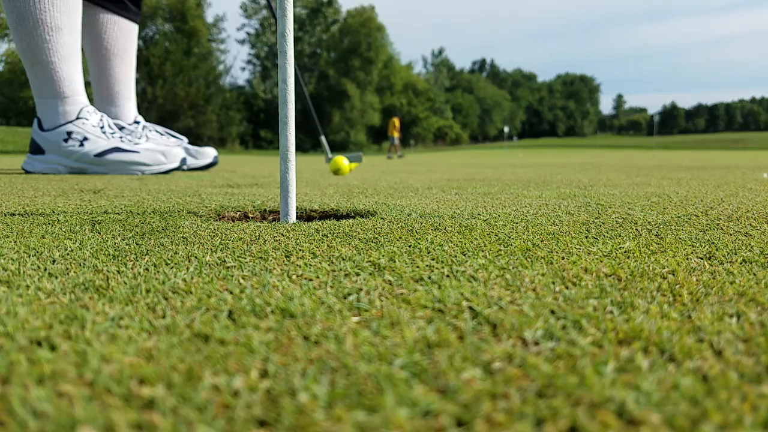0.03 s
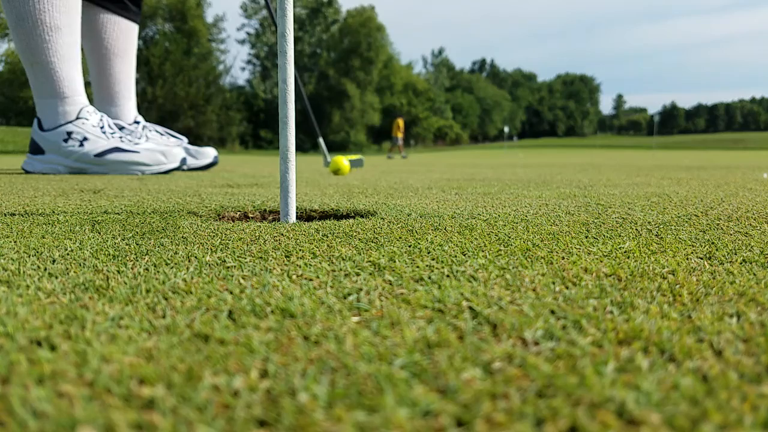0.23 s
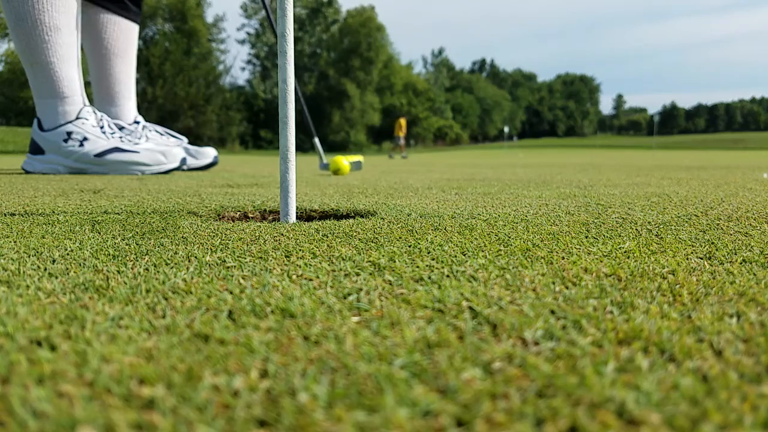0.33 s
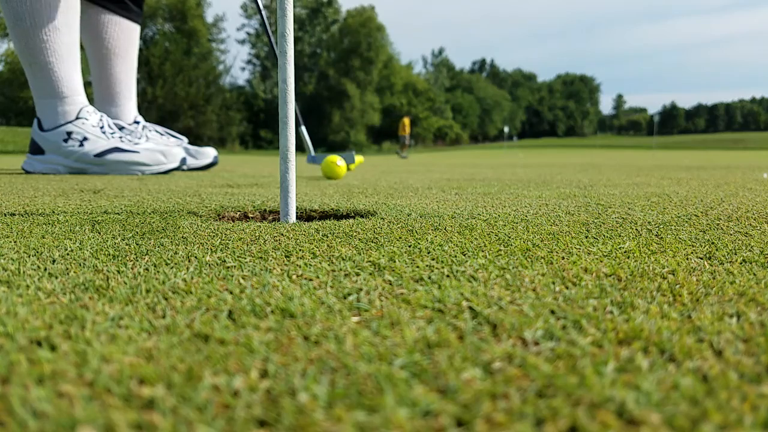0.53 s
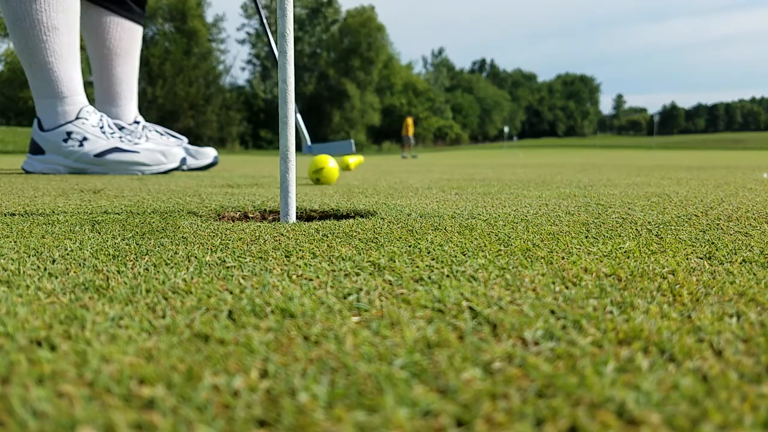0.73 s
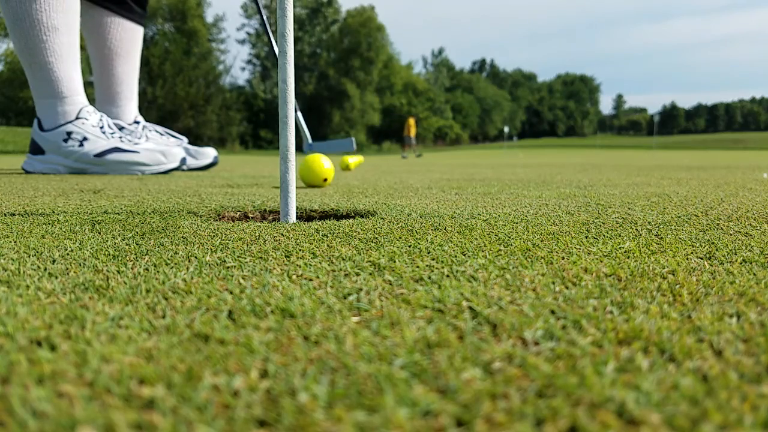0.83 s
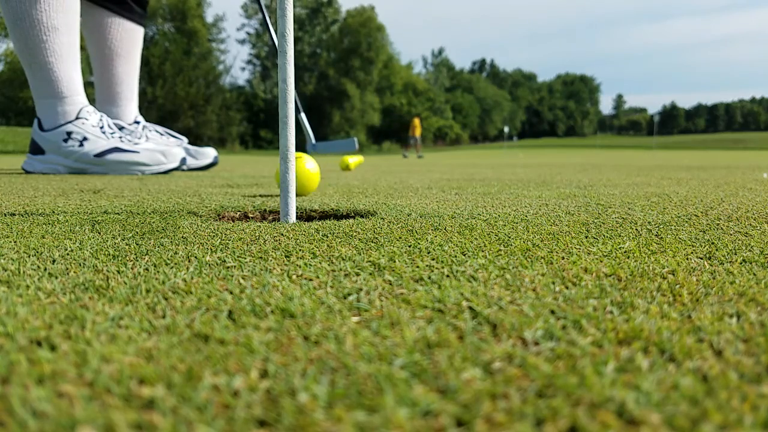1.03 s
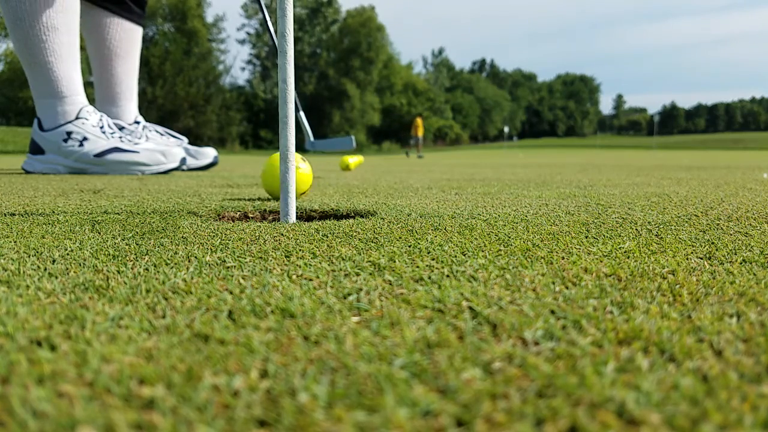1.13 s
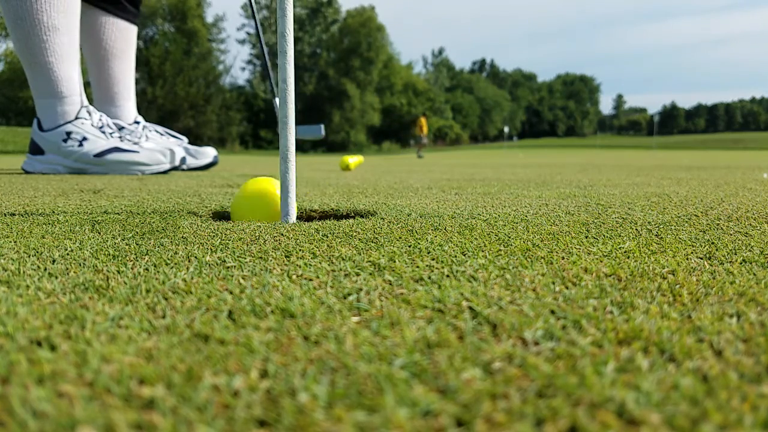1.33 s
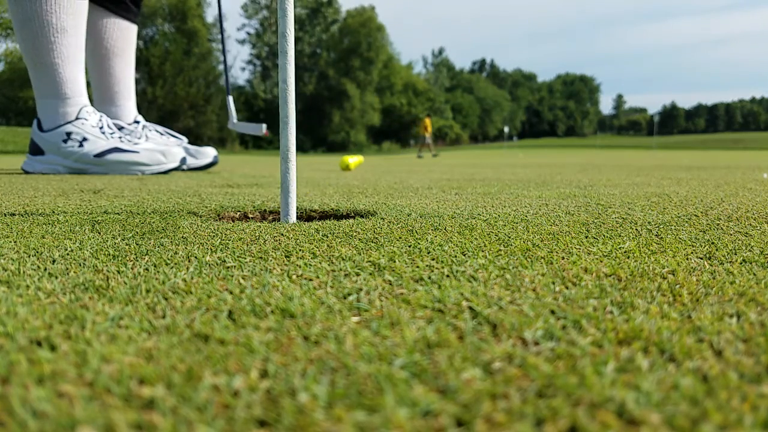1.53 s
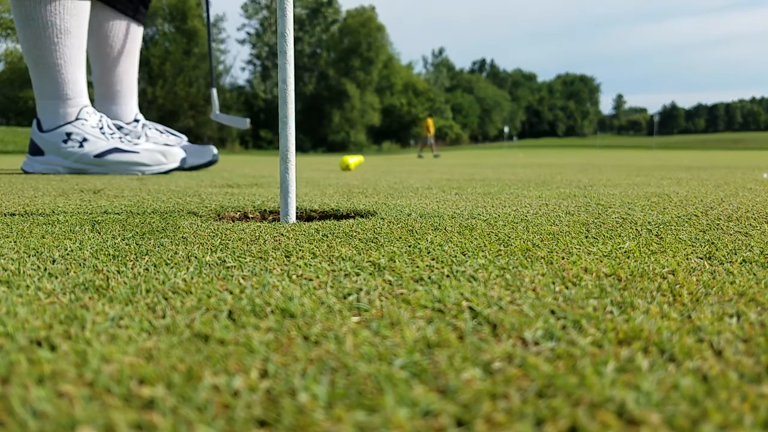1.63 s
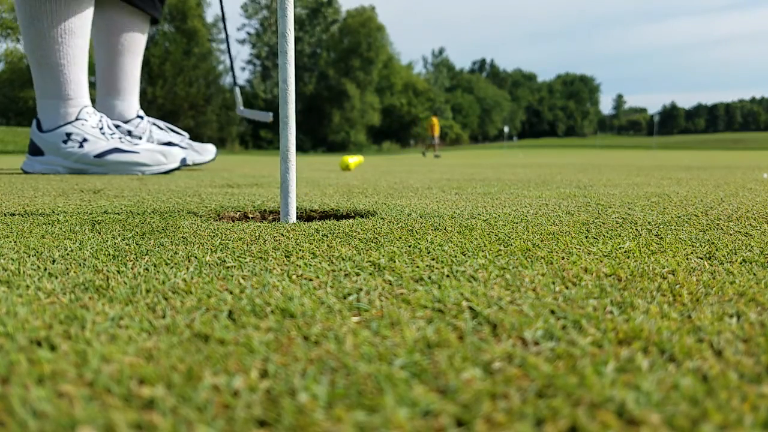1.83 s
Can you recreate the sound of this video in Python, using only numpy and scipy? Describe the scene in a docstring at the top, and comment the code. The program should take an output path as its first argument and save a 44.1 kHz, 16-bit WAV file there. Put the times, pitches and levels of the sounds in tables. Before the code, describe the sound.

A golf ball drops into a cup: a dry putter click, about a second of quiet outdoor traffic rumble, then a quick hollow rattle with a bright ring, close to the microphone, stronger on the left.

```python
"""Far traffic rumbles and an insect chirps thinly; soon a putter clicks on a ball, mostly on the left.
A second later the ball, after faintly brushing the grass, hits the flagstick, rattles down the cup and
bounces on its bottom, ringing the hollow and the liner. Knocks are sums of fading sine waves plus bursts
of coloured noise; traffic, grass, insect and hiss are coloured noise, all but the hiss shaped over time."""
import sys
import numpy as np
from scipy.fft import rfft, irfft, next_fast_len
from scipy.io import wavfile
from scipy.ndimage import uniform_filter1d, map_coordinates

SR = 44100
rng = np.random.default_rng(int(sys.argv[2]) if len(sys.argv) > 2 else 0)


def transcribe(u):
    """Save the signal u as a 16-bit wav file named by the first command-line argument.

    u: samples, shape (n,) or (channels, n), limited to [-1, 1]; the rate is SR.
    q: integer samples, one column per channel.
    """
    v = np.clip(np.atleast_2d(u).T, -1, 1)
    q = np.round(v * 32767).astype(np.int16)
    wavfile.write(sys.argv[1], SR, q)


N = 83790  # length in samples, 1.9 s

# All noise colours below are relative levels: noise() sets the overall strength to 1.
# microphone hiss, its colour: f/Hz, level per Hz/dB
HISS_COLOUR = [(1000, 0), (4000, -7.5), (7000, -12.5), (10000, -0.5), (12500, -4), (15500, 3.5)]
HISS_DB, RIGHT_HISS_DB = -53, -9.5  # left level; right level relative to the left

# traffic, mean levels before a slight waver: t/s, rumble level/dB, road roar level/dB
TRAFFIC_LEVELS = [(0, -30.5, -38.5), (.12, -34, -37), (.3, -30.5, -36), (.5, -32.5, -34.5),
                  (.75, -31.5, -34.5), (1.05, -34.5, -33.5), (1.35, -32, -34), (1.6, -31.5, -32.5),
                  (1.9, -35.5, -39.5)]
# engine rumble, its colour: f/Hz, level per Hz/dB
RUMBLE_COLOUR = [(20, -25), (40, -14.5), (62, -11), (82, -3.5), (115, -0.5), (143, 0.5), (170, -1.5),
                 (245, -2), (300, -7.5), (420, -11), (700, -12.5), (1500, -46.5)]
# tyre roar, its colour: f/Hz, level per Hz/dB
ROAR_COLOUR = [(100, -31), (350, -10.5), (500, -7.5), (620, -3), (715, 3), (820, -2.5), (950, -4.5),
               (1300, -5), (2000, -12), (3000, -23.5), (4500, -33), (8000, -55), (16000, -59)]

# insect in the grass, its colour: f/Hz, level per Hz/dB
CHIRP_COLOUR = [(7000, -30), (8700, 8), (10000, 0), (11000, -19), (13000, -25)]
CHIRP_FIRST_S, CHIRP_PERIOD_S, CHIRP_WIDTH_S, CHIRP_DB = 0.086, 0.23, 0.03, -63

# ball brushing the grass, mean level before a flutter: t/s, level/dB
ROLL_LEVELS = [(0.9, -85), (1.12, -60), (1.2, -54), (1.25, -66), (1.39, -60), (1.43, -87)]
# brushed grass, its colour: f/Hz, level per Hz/dB
GRASS_COLOUR = [(1000, -15), (3000, 0), (7000, -1), (14000, 3)]

# ringing of putter and ball, relative levels: f/Hz, level/dB, time to fall 60 dB (t60)/s
PUTT_MODES = [(430, -13, 0.0078), (840, 5.5, 0.0044), (1200, -7.5, .006), (2220, -1, 0.0053),
              (2780, -5, 0.006), (3980, -9.5, 0.014), (5000, -25, 0.01), (6850, -26, 0.0079),
              (8060, -21, 0.0092), (9100, -23, 0.0079)]
PUTT_S, PUTT_DB, PUTT_CONTACT_S = 0.4076, -6.5, 0.00025  # time, level, rise time of the push
PUTT_TICK_DB, PUTT_TICK_T60_S = -33, 0.005  # noisy tick, relative to PUTT_DB

# ball against stick and cup: t/s, then thud, hollow, liner, treble, stick, scuff and crack level/dB,
# swell time/s, pitch sag/share of the pitch, hollow ring time/ratio
CONTACTS = [ (1.4088, -31, -22.5, -40, -54, -50, -34, -26, 0.00024, 0.011, 1.9),
            (1.4161, -20, -13, -41, -45, -39, -21.5, -23, 0.0011, 0.0087, 0.75),
            (1.4323, -35, -16, -46, -60, -46, -49, -40, 0.0014, .01, 0.41),
            (1.4397, -19, -23, -43, -56, -46, -36, -34, 0.0022, .01, 0.43),
            (1.4483, -50, -19, -42, -58, -60, -25.5, -20.5, 0.00064, 0.0091, 0.77),
            (1.4557, -17.5, 5, -32, -49, -29.5, -22, -5, 0.0041, 0.054, 0.43),
            (1.4769, -49, -16.5, -40, -54, -48, -46, -40, .001, 0.008, 0.51),
            (1.4991, -22, -26.5, -42, -56, -49, -38, -41, 0.0015, 0.013, 1.1),
            (1.53, -16.5, -4.5, -8.5, -19, -33, -16, -3, 0.00039, 0.033, 0.89),
            (1.5374, -30, -8.5, -13, -26.5, -28, -18.5, -29, 0.0025, 0.048, 0.53),
            (1.5520, -17.5, -7, -22, -33, -46, -26, -38, 0.0031, 0.0075, 0.72),
            (1.5891, -16.5, -13.5, -18, -40, -49, -24, -19, 0.0012, 0.062, 0.44),
            (1.6024, -16.5, -13, -42, -39, -58, -34, -40, 0.0038, 0.0069, 0.77),
            (1.6230, -26, -39, -52, -50, -55, -43, -36, 0.00065, .01, 0.71)]
# Ringing below: relative levels, each nudged at random by about 1 dB at every contact.
# thud of the cup in the soil: f/Hz, level/dB, t60/s
THUD_MODES = [(174.5, -7.5, 0.13), (233.5, -8, 0.24), (378.7, -6, 0.18), (416.5, 1, 0.11), (501, -5, 0.08)]
# hollow of the cup: f/Hz, level/dB, t60 before the contact's ratio/s
HOLLOW_MODES = [(1076, -14, .05), (1109, 4.5, 0.064), (1265, -9, 0.064)]
# cup liner: f/Hz, level/dB, t60/s
LINER_MODES = [(2025, 2, 0.06), (2190, -10, 0.034), (4026, -4, 0.068)]
# bright ring of the liner: f/Hz, level/dB, t60/s
TREBLE_MODES = [(6560, -10, .065), (7495, -7, .075), (9645, 0, .04), (10320, -6, .05), (10645, -9, .1),
                (11500, -6, .05), (13535, -13, .11)]
# flagstick: f/Hz, level/dB, t60/s
STICK_MODES = [(2120, 0, .07), (3990, -1, .06), (4400, -4, .05), (6680, -6, .08), (7035, -5, .08),
               (14200, -14, .05), (15570, -6, .06)]
# toneless scuff of a contact, also used in the putt's tick: f/Hz, level per Hz/dB
SCUFF_COLOUR = [(80, -16), (400, 6.5), (750, -6.5), (1300, 3), (1700, -4.5), (2300, 1.5), (3000, -8.5),
                (4200, -4.5), (5500, -20), (10000, -23), (16000, -19)]
# crack at the instant of contact: f/Hz, level per Hz/dB
CRACK_COLOUR = [(120, -24), (400, -5), (800, -10), (1350, 7), (1750, -13), (2300, -1), (2900, -22),
                (3600, 2.5), (4400, -19), (6000, -15), (10000, -24.5), (16000, -26)]
SCUFF_T60_S, CRACK_T60_S = 0.074, 0.016
SAG_S = 0.0204  # recovery time of the pitch, which is flat while the ball presses on the cup
ROUGH_RAD, ROUGH_PER_S = 0.38, 235  # size and speed of the unsteadiness in phase

# likeness of the two channels: f/Hz, left-right correlation (1 = identical)
ALIKE = [(30, 0.77), (100, .95), (1000, 0.93), (3000, 0.76), (8000, 0.27)]
# shading of the right microphone: f/Hz, level/dB
RIGHT_SHADE = [(1000, 0), (2000, -1), (4000, 1), (8000, -5.5), (13000, -5)]
# the right microphone is further from every source: (level in dB, delay in s)
RIGHT_RUMBLE, RIGHT_ROAR = (-9, 0.00028), (-11, 0.00036)
RIGHT_PUTT, RIGHT_CUP = (-10.5, 0.00004), (-11.5, 0.00013)

# the recorder: gain control, ceiling (1 = full scale) and band limits
LIMIT_DB, LIMIT_WINDOW_S, RECOVER_DB_PER_S = -6.5, 0.0033, 6
CLIP_TOP, LOW_CUT_HZ, TOP_HZ = 0.96, 44.5, 16000


def amp(db):
    """Turn decibels into a gain."""
    return 10 ** (np.asarray(db) / 20)


def unit(x):
    """Scale to an rms (average strength) of 1."""
    return x / np.sqrt(np.mean(x ** 2) + 1e-20)


def along(points, hz):
    """Read a curve of (f, value) points at any frequency, on a log axis."""
    f, value = np.transpose(points)
    return np.interp(np.log(hz + 1), np.log(f + 1), value)


def fade(t, t60):
    """Die away exponentially, 60 dB down at t60."""
    return np.exp(-np.log(1000) * t / t60)


def wobble(rate, size):
    """Draw a smooth random curve through `rate` random points a second."""
    points = rng.standard_normal(2048)
    return map_coordinates(points, [np.arange(size) * rate / SR + 2], mode="wrap")


def noise(colour, alike, size):
    """Make coloured stereo noise of rms 1 whose channels are as alike as asked at each frequency."""
    m = next_fast_len(size + 8192)
    hz = np.fft.rfftfreq(m, 1 / SR)
    # a shared and an opposed part, mixed by an angle, give the wanted correlation
    turn = np.arccos(np.clip(along(alike, hz), -1, 1)) / 2
    white = rfft(rng.standard_normal((2, m)))
    coloured = white * amp(along(colour, hz)) * [np.cos(turn), np.sin(turn)]
    mid, side = irfft(coloured, m)[:, :size]
    return unit(np.array([mid + side, mid - side]))


def filtered(x, response):
    """Pass x through a filter given as a complex response at each frequency."""
    m = next_fast_len(N + SR // 2)
    hz = np.fft.rfftfreq(m, 1 / SR)
    return irfft(rfft(x, m) * response(hz), m)[..., :N]


def lean(x, right_db, delay_s):
    """Make the right channel weaker, duller and later, as at a more distant microphone."""
    def right_response(hz):
        delay = np.exp(-2j * np.pi * hz * delay_s)
        return amp(right_db + along(RIGHT_SHADE, hz)) * delay
    return np.array([x[0], filtered(x[1], right_response)])


def add(track, s, x):
    """Mix x into the track at time s."""
    i = round(s * SR)
    track[:, i:i + x.shape[-1]] += x[..., :N - i]


def ring(modes, t, spread, sag=0):
    """Sum slightly unsteady fading sines that start flat by sag; spread (rad) scatters channel phases."""
    out = np.zeros((2, len(t)))
    clock = t - sag * SAG_S * (1 - np.exp(-t / SAG_S))  # runs slow at first, so the pitch is low
    for hz, db, t60 in modes:
        unsteady = ROUGH_RAD * wobble(ROUGH_PER_S, len(t))
        phase = unsteady + spread * rng.standard_normal((2, 1))
        level = amp(db + rng.normal(0, 1))
        out += level * fade(t, t60) * np.sin(2 * np.pi * hz * clock + phase)
    return out


def hiss():
    """The microphones' own steady hiss, almost unrelated between the channels."""
    levels = amp([[HISS_DB], [HISS_DB + RIGHT_HISS_DB]])
    return levels * noise(HISS_COLOUR, [(1000, 0.1)], size=N)


def traffic():
    """Far engines rumble under the roar of tyres; the level of each wavers a little."""
    s, *levels = np.transpose(TRAFFIC_LEVELS)
    rumble_db, roar_db = [np.interp(np.arange(N) / SR, s, level) for level in levels]
    rumble = amp(rumble_db + 0.68 * wobble(9.47, size=N)) * noise(RUMBLE_COLOUR, ALIKE, size=N)
    roar = amp(roar_db + 0.43 * wobble(6.76, size=N)) * noise(ROAR_COLOUR, ALIKE, size=N)
    return lean(rumble, *RIGHT_RUMBLE) + lean(roar, *RIGHT_ROAR)


def insect():
    """An insect chirps just over four times a second: high noise swelling in smooth bell shapes."""
    half = CHIRP_PERIOD_S / 2
    # time from the middle of the nearest chirp
    since = (np.arange(N) / SR - CHIRP_FIRST_S + half) % CHIRP_PERIOD_S - half
    swell = np.exp(-0.5 * (since / CHIRP_WIDTH_S) ** 2)
    return lean(amp(CHIRP_DB) * swell * noise(CHIRP_COLOUR, ALIKE, size=N), *RIGHT_ROAR)


def roll():
    """The ball faintly brushes the grass as it comes near: fluttering bright noise."""
    level_db = np.interp(np.arange(N) / SR, *np.transpose(ROLL_LEVELS))
    flutter_db = 3 * wobble(130, size=N)
    return lean(amp(level_db + flutter_db) * noise(GRASS_COLOUR, ALIKE, size=N), *RIGHT_CUP)


def putt():
    """One dry click: the putter's face pushes the ball, which rings for a few milliseconds."""
    out, t = np.zeros((2, N)), np.arange(SR // 10) / SR
    body = sum(amp(db) * fade(t, t60) * np.sin(2 * np.pi * hz * t) for hz, db, t60 in PUTT_MODES)
    tick = amp(PUTT_TICK_DB) * fade(t, PUTT_TICK_T60_S) * noise(SCUFF_COLOUR, ALIKE, size=len(t))
    push = 1 - np.exp(-t / PUTT_CONTACT_S)
    add(out, PUTT_S, amp(PUTT_DB) * (body + tick) * push)
    return lean(out, *RIGHT_PUTT)


def cup():
    """Every contact rings the same cup and stick; where the ball lands sets the mix and damps the hollow."""
    out, t = np.zeros((2, N)), np.arange(SR // 4) / SR
    for (s, thud_db, hollow_db, liner_db, treble_db, stick_db, scuff_db, crack_db,
         swell_s, sag, ring_ratio) in CONTACTS:
        hollow = [(hz, db, t60 * ring_ratio) for hz, db, t60 in HOLLOW_MODES]
        hit = amp(thud_db) * ring(THUD_MODES, t, spread=0)
        hit += amp(hollow_db) * ring(hollow, t, spread=0, sag=sag)
        hit += amp(liner_db) * ring(LINER_MODES, t, spread=0.5, sag=sag)
        hit += amp(treble_db) * ring(TREBLE_MODES, t, spread=1)
        hit += amp(stick_db) * ring(STICK_MODES, t, spread=0.5)
        hit += amp(scuff_db) * fade(t, SCUFF_T60_S) * noise(SCUFF_COLOUR, ALIKE, size=len(t))
        hit += amp(crack_db) * fade(t, CRACK_T60_S) * noise(CRACK_COLOUR, ALIKE, size=len(t))
        add(out, s, hit * (1 - np.exp(-(t / swell_s) ** 2)))
    return lean(out, *RIGHT_CUP)


def scene():
    """Putt, roll and drop over the open-air background."""
    return putt() + roll() + cup() + traffic() + insect() + hiss()


def gain_control(x):
    """A loud knock on the left turns both channels down at once; the gain creeps back slowly."""
    power = np.abs(uniform_filter1d(x[0] ** 2, max(1, int(LIMIT_WINDOW_S * SR))))
    over_db = np.maximum(10 * np.log10(power + 1e-12) - LIMIT_DB, 0)
    creep_db = RECOVER_DB_PER_S * np.arange(N) / SR
    # the strongest knock so far, less the recovery since then
    reduction_db = np.maximum.accumulate(over_db + creep_db) - creep_db
    return x * amp(-reduction_db)


def record(dry):
    """The recorder rides the gain, rounds off peaks, thins deep bass and drops all above its band limit."""
    held = gain_control(dry)
    rounded = held / (1 + np.abs(held / CLIP_TOP) ** 6) ** (1 / 6)
    return filtered(rounded, lambda hz: 1j * hz / (LOW_CUT_HZ + 1j * hz) * (hz < TOP_HZ))


dry = scene()
out = record(dry)
transcribe(out)
```